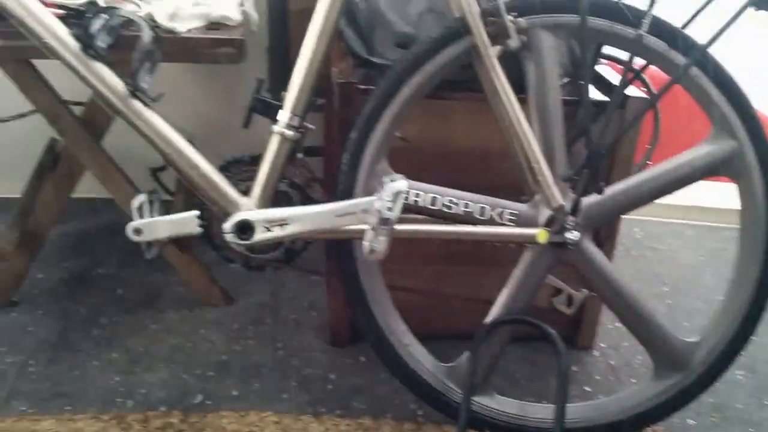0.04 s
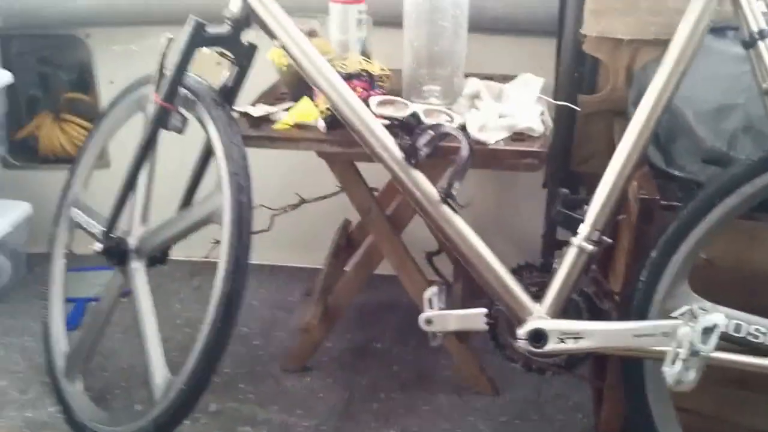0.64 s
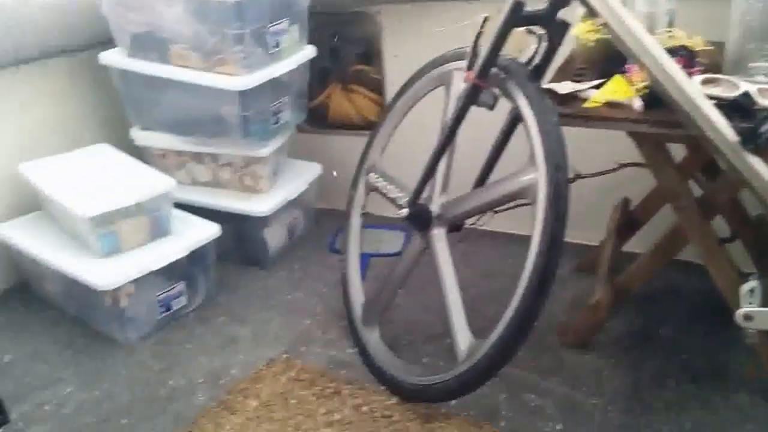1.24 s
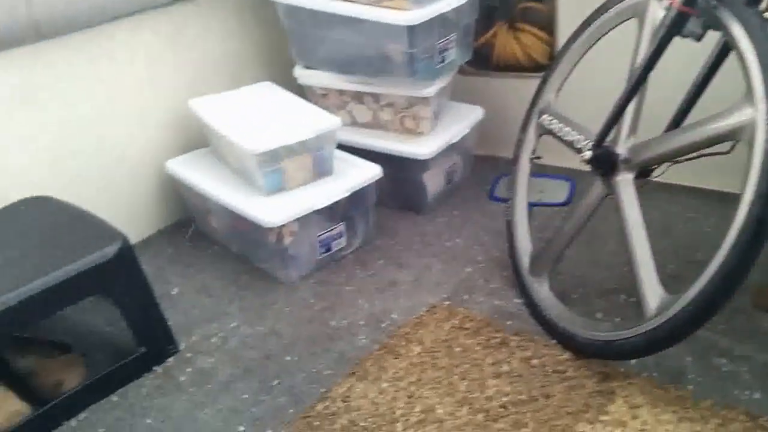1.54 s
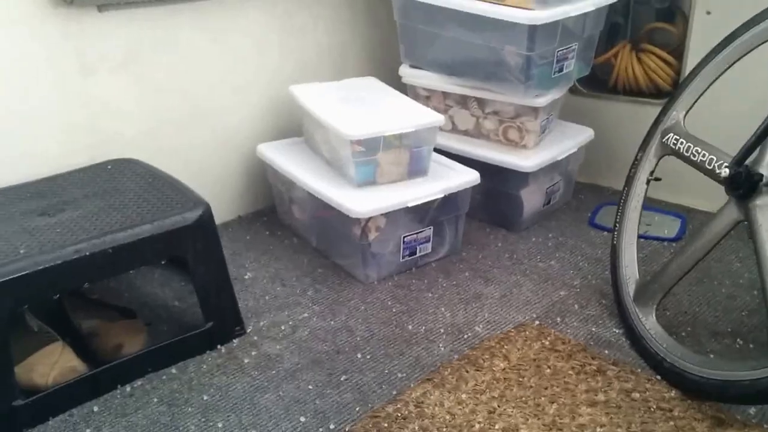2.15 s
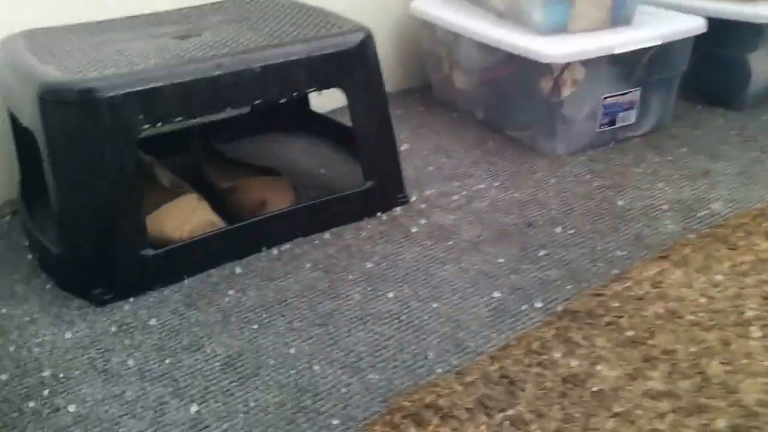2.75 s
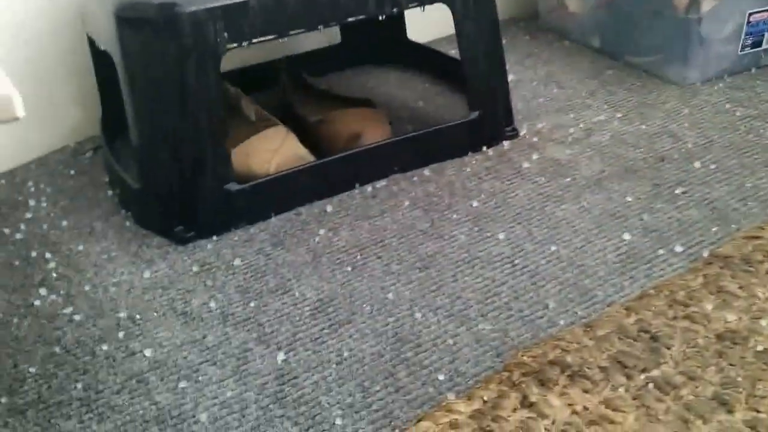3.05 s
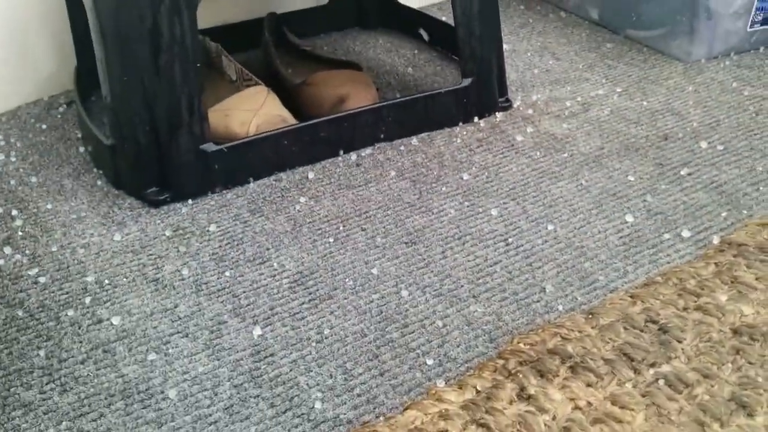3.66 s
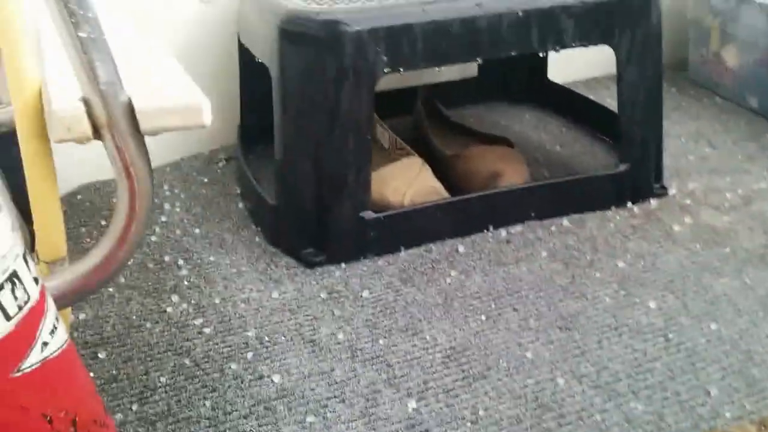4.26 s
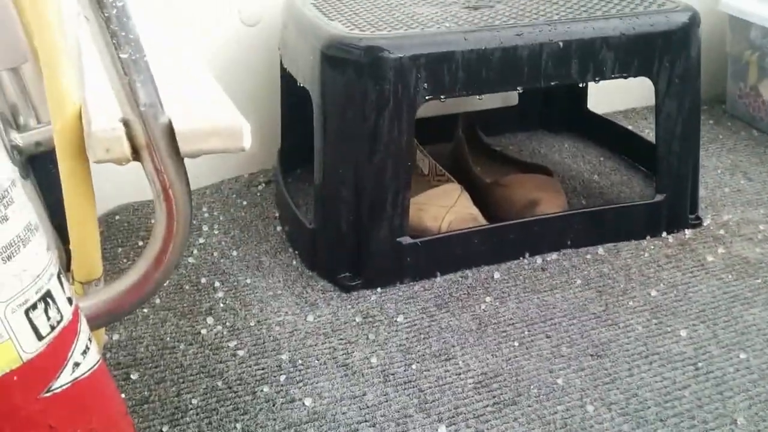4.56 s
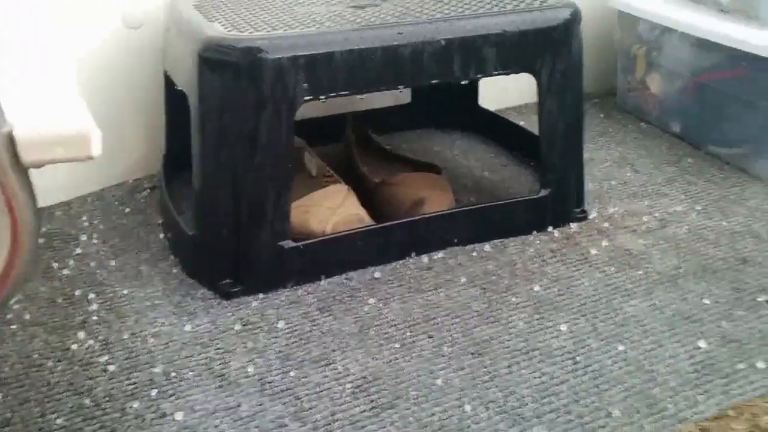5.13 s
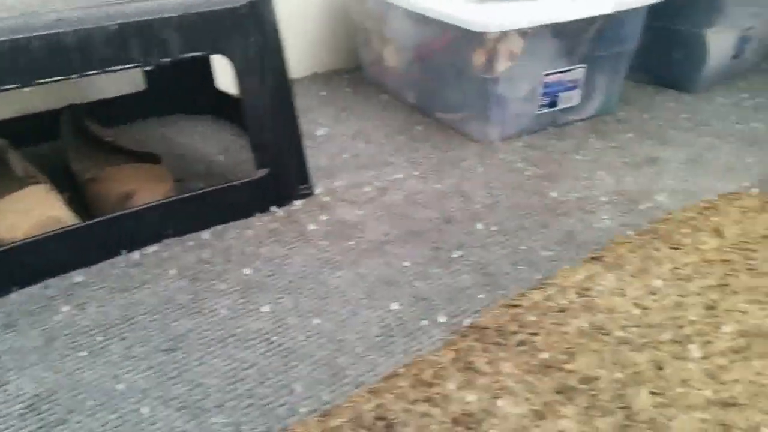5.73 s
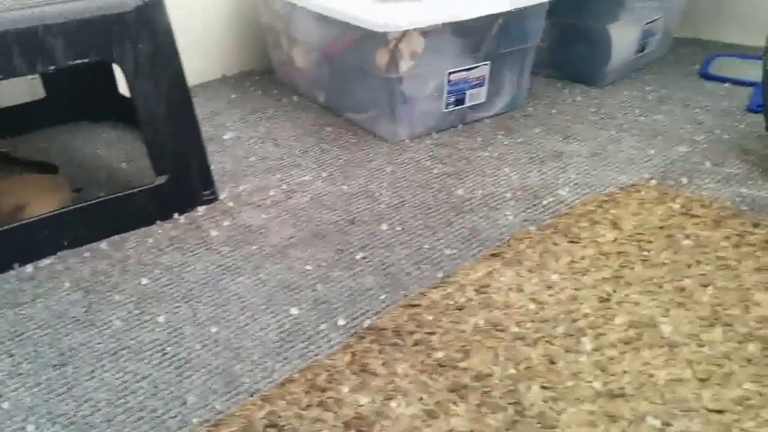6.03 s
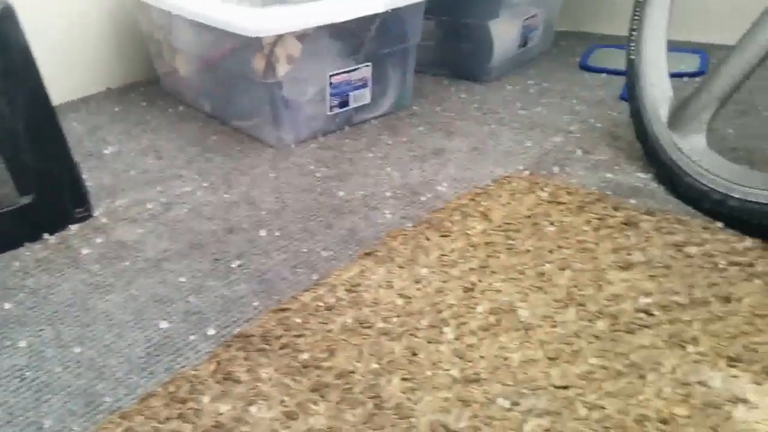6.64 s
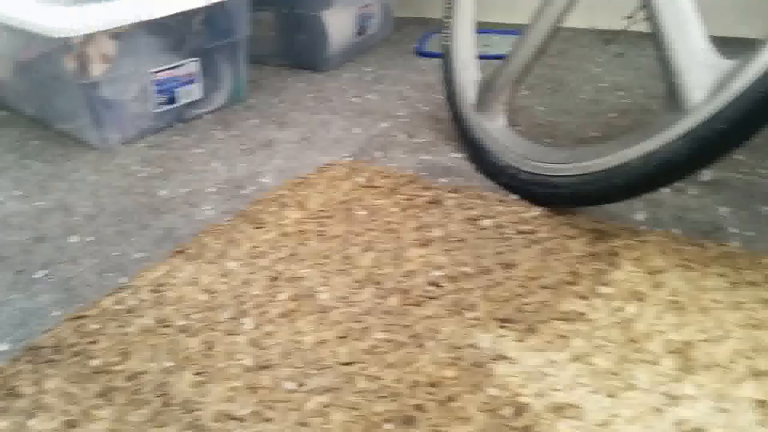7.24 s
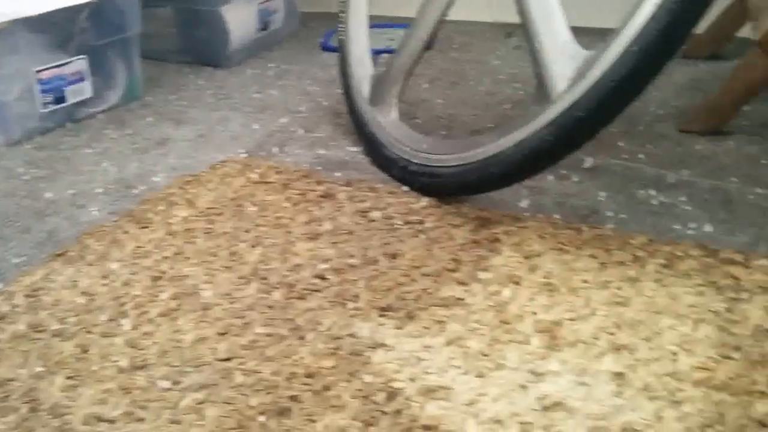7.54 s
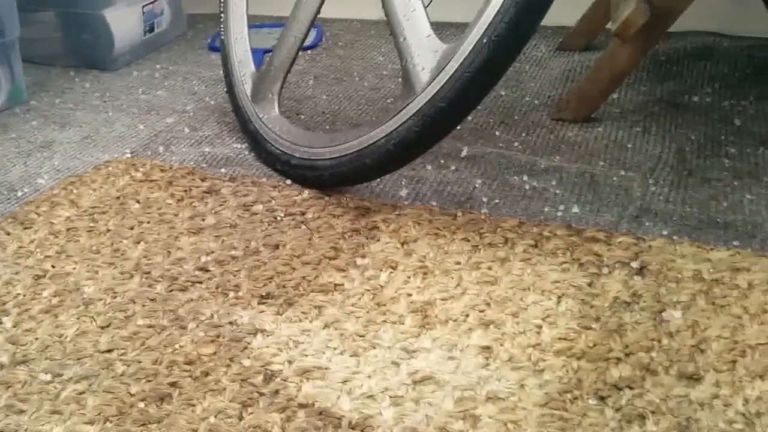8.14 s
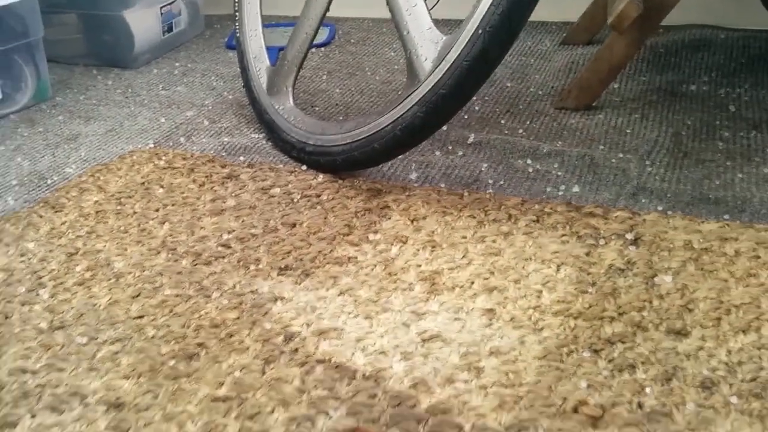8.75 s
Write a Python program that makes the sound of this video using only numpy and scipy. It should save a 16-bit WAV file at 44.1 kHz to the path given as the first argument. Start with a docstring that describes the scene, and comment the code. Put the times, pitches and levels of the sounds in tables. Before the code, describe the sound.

Small hailstones blow into a porch and patter continuously, swelling and easing in gusts. Bigger stones close to the microphone knock on plastic boxes, a stool and the walls, with bright icy ticks, hollow pops and little bounces. Large panels answer with dull thuds. A heavy knock lands about two seconds in and a sharp crack around four seconds. Faint distant hail hisses behind, and the porch adds a brief echo.

```python
"""Small hailstones blow into a porch and hit plastic boxes, a stool, the walls and the carpet.
Each big stone knocks on what it strikes, ticks and hops once; large panels answer with dull thuds.
Countless smaller stones patter and skitter around them in gusts, over the faint hiss of far-off hail.
Each hit is a short push of noise shaped by the tones of the thing struck; the porch adds a brief echo."""
import sys
import numpy as np
from scipy import signal
from scipy.fft import rfft, irfft
from scipy.io import wavfile

SR = 44100
rng = np.random.default_rng(int(sys.argv[2]) if len(sys.argv) > 2 else 0)


def pcm_store(signal):
    """Save signal as 16-bit PCM."""
    levels = np.round(np.clip(np.atleast_2d(signal), -1, 1) * 32767)
    wavfile.write(sys.argv[1], SR, levels.astype(np.int16).T)


N = 387638
TIME = np.arange(N) / SR
SIZE = 8192  # samples in one hit
AGE = np.arange(SIZE) / SR  # seconds since the hit
FREQS = np.fft.rfftfreq(SIZE, 1 / SR)

# how strongly struck things knock, from low to high: f/Hz, level/dB
KNOCK_TONE = [(100, -18), (450, 7), (700, 6), (4100, 1.5), (5100, -7), (13000, -21.5)]
# the bright tone of ticking ice: f/Hz, level/dB
ICE_TONE = [(2500, -65), (4900, -18.5), (6500, -7.5), (8400, -2.5), (11000, -5.5), (15500, -14.5)]


def gain_of(db):
    """Turns decibels into a number to multiply by."""
    return 10 ** (np.asarray(db) / 20)


def unit_level(x):
    """Scales a sound to an average power of one."""
    return x / np.sqrt(np.mean(x ** 2) + 1e-20)


def unit_blow(x, blow_s=0.002):
    """Gives a hit the same energy as a sound of power one lasting blow_s."""
    return x * np.sqrt(SR * blow_s / (np.sum(x ** 2) + 1e-20))


def add(mix, start_s, sound):
    """Mixes a sound in at the given time."""
    part = mix[max(round(start_s * SR), 0):][:len(sound)]
    part += sound[:len(part)]


def curve(points, hz):
    """Joins (frequency, level) points with lines, giving each octave equal room."""
    point_hz, point_db = np.transpose(points)
    return np.interp(np.log(hz + 1), np.log(point_hz), point_db)


def hump(hz, slope_db):
    """A broad peak in dB around one pitch, falling by slope_db an octave on both sides."""
    return np.maximum(-slope_db * abs(np.log2((FREQS + 1) / hz)), -70)


def resonance(hz, width_hz):
    """The bell-shaped power curve of something that rings at one pitch."""
    return 1 / (1 + ((FREQS - hz) / width_hz) ** 2)


def spot_tone(spacing_hz, depth_db):
    """Every spot that is struck has its own chance peaks and dips, in dB."""
    hz = np.arange(0, SR, spacing_hz)
    bumps = np.clip(rng.standard_normal(SIZE // 2)[:len(hz)], -2, 2)
    return depth_db * np.interp(FREQS, hz, bumps)


def ring(push, tone_db):
    """Shapes a push with a tone curve, whose peaks ring on after the blow."""
    cepstrum = irfft(np.log(gain_of(tone_db)))
    # fold the filter forward in time, so nothing sounds before the push
    cepstrum[1:SIZE // 2] *= 2
    cepstrum[SIZE // 2 + 1:] = 0
    return irfft(rfft(push) * np.exp(rfft(cepstrum)))


def gusts():
    """The hail comes in gusts: one gain over time for tapping stones, one for skittering ice."""
    # strength of the shower, before each layer's own gain: t/s, stone level/dB, ice level/dB
    shower = [(0.0, -50.5, -59), (0.56, -50.5, -54.5), (0.98, -42.5, -64.5), (1.27, -51.5, -54),
              (1.96, -45.5, -55.5), (2.182, -40.5, -51), (2.47, -54.5, -56), (3.67, -64, -66),
              (3.89, -50, -58), (4.31, -52, -56.5), (4.6, -62.5, -69.5), (5.46, -52.5, -52.5),
              (6.24, -61, -65.5), (6.46, -49, -58), (6.83, -53.5, -65), (7.46, -45.5, -56),
              (8.13, -52.5, -63.5), (8.79, -47.5, -58.5)]
    times, stone_db, ice_db = np.transpose(shower)
    return gain_of(np.interp(TIME, times, stone_db)), gain_of(np.interp(TIME, times, ice_db))


def patter(sounds, per_s, spread_db):
    """A steady fall: one hit of random kind and strength at a random moment in each short stretch."""
    out = np.zeros(N)
    draws = rng.random((2000, 3))[:int(per_s * N / SR) + 1]
    for slot, (when, kind, chance) in enumerate(draws):
        boost_db = spread_db * min(-np.log(chance), 3)  # many weak hits, few strong ones
        add(out, (slot + when) / per_s, gain_of(boost_db) * sounds[int(kind * len(sounds))])
    return unit_level(out)


def small_stones(count=48):
    """Little stones tap all around, some with a hollow pop; ice skitters in tiny sprays and clicks."""
    taps = [tap(hz) for hz in np.geomspace(600, 3200, count)]
    taps += [pop(hz) for hz in np.geomspace(700, 3400, count)]
    bits = [tick(near=rng.random() / 2) for _ in range(count)]
    bits += [chip() / 2 for _ in range(count // 4)]
    stone_gusts, ice_gusts = gusts()
    stones = stone_gusts * gain_of(-4) * patter(taps, per_s=150, spread_db=9)
    ice = ice_gusts * gain_of(0.5) * patter(bits, per_s=130, spread_db=9)
    return stones + ice


def tap(hz, longest_wait_s=0.019):
    """A stone farther off gives a rounded knock, then rattles on in two little pops of other pitches."""
    out = knock(near=0.25, hz=hz, treble_db_per_octave=-3, slope_db=5.0)
    for wait, octaves in rng.random((2, 2)):
        add(out, wait * longest_wait_s, gain_of(-7) * pop(hz * 2 ** (octaves - 0.5)))
    return unit_blow(out)


def strike(near, crack_s, scatter_s, rise_s, clump_db, skip_wait_s=(0.0031, 0.0066), skip_fade_s=0.015):
    """A stone's push: a sharp crack if near (1), a swell of reflections if far (0), then two skips."""
    near = np.clip(near, 0, 1)
    crack = unit_blow(np.exp(-AGE / (crack_s * (1.12 - near))))
    clumps = gain_of(clump_db * np.interp(AGE, AGE[::SIZE // 128], rng.standard_normal(128)))
    scatter = unit_blow(clumps * np.exp(-AGE / scatter_s) * (1 - np.exp(-AGE / rise_s)) ** 2)
    power = near * crack ** 2 + (1 - near) * scatter ** 2
    for t in np.cumsum(rng.uniform(*skip_wait_s, 2)):
        skip = gain_of(-7) * np.exp(-t / skip_fade_s) * crack
        add(power, t, skip ** 2)
    return np.sqrt(power) * rng.standard_normal(SIZE)


def knock(near, hz, treble_db_per_octave, slope_db, muffle_db=20):
    """The struck surface gives a little, softer from afar, then rings briefly around its own pitch."""
    tone_db = curve(KNOCK_TONE, FREQS) + hump(hz, slope_db) + 7.0 * resonance(hz, width_hz=120)
    tone_db += spot_tone(spacing_hz=316.0, depth_db=4.8)
    tone_db += treble_db_per_octave * np.log2(np.maximum(FREQS / 2800, 1))
    tone_db -= muffle_db * (1 - near) * np.interp(FREQS, (4150, 4070), (0, 1))  # far stones lose treble
    give_s = 0.00031 + 0.0033 * (1 - near) ** 2
    soft_start = 1 - np.exp(-AGE / give_s)
    push = strike(near, crack_s=0.02, scatter_s=0.015, rise_s=0.0011, clump_db=2.0)
    return unit_blow(ring(push * soft_start, tone_db))


def pop(hz, rise_s=0.0013, fade_s=0.0024):
    """A hollow wall swells and rings for a moment in a cluster of close pitches."""
    push = rng.standard_normal(SIZE) * (1 - np.exp(-AGE / rise_s)) ** 2 * np.exp(-AGE / fade_s)
    tone_db = curve(KNOCK_TONE, FREQS) + hump(hz, slope_db=14) + spot_tone(325, 4.7)
    return unit_blow(ring(push, tone_db))


def tick(near):
    """The bright tick of the ice: a soft spray from afar, starting with a sharp snap from close by."""
    push = unit_blow(strike(near, crack_s=0.0078, scatter_s=0.011, rise_s=0.0027, clump_db=4.5))
    snap = 0.69 * near ** 2 * unit_blow(signal.unit_impulse(SIZE))
    return unit_blow(ring(push + snap, curve(ICE_TONE, FREQS) + spot_tone(720, 1.8)))


def chip(spray_db=-3, spray_s=0.005):
    """A chip of ice clicks: one crisp snap and a weaker, short spray."""
    spray = unit_blow(rng.standard_normal(SIZE) * np.exp(-AGE / spray_s))
    push = unit_blow(signal.unit_impulse(SIZE)) + gain_of(spray_db) * spray
    return unit_blow(ring(push, curve(ICE_TONE, FREQS) + spot_tone(930, 8.4)))


def distant_hail(follow=0.66):
    """Far-off hail merges into a faint hiss that partly follows the gusts."""
    # tone of the far-off hail: f/Hz, relative level/dB
    hiss_tone = [(20, -12), (60, 21), (250, 11), (1000, 4.5), (3300, -15.5), (5200, -12), (8400, 3.5),
                 (16000, -18)]
    tone = gain_of(curve(hiss_tone, np.fft.rfftfreq(N, 1 / SR)))
    hiss = irfft(rfft(rng.standard_normal(N)) * tone, N)
    stone_gusts, _ = gusts()
    return gain_of(-66.5) * unit_level(hiss * stone_gusts ** follow)


def thud(hz, fade_cycles=5.65, rise_s=0.0012):
    """A large panel swells and rings low; the lower it is, the longer it lasts."""
    push = rng.standard_normal(SIZE) * np.exp(-AGE * hz / fade_cycles) * (1 - np.exp(-AGE / rise_s))
    return unit_blow(ring(push, hump(hz, slope_db=10.7) + spot_tone(58.2, 3.5)))


def panels(follow=0.62, roll_middle_s=3.333, roll_half_s=0.18, sway_wait_s=0.018):
    """Large panels thud over a soft drumming that partly follows the gusts, with one quick roll."""
    # the heaviest blows on the panels: t/s, level/dB, f/Hz
    heavy_blows = [(0.049, -32, 410), (0.22, -34.5, 200), (0.32, -29, 352), (0.396, -29.5, 368),
                   (0.592, -28, 396), (0.82, -43, 233), (1.312, -29, 223), (1.705, -27.5, 380),
                   (1.757, -19.5, 314), (1.836, -35, 380), (2.022, -14, 217), (2.124, -28.5, 150),
                   (2.597, -33, 160), (2.886, -31.5, 224), (3.105, -25.5, 248), (3.622, -38, 258),
                   (3.706, -33.5, 240), (4.861, -29.5, 240), (5.253, -29, 192), (5.834, -29.5, 310),
                   (6.981, -35, 282), (7.042, -33.5, 285), (7.278, -30, 336), (7.355, -30, 315),
                   (7.475, -36.5, 307), (7.526, -33, 165), (7.674, -32, 310), (7.916, -26.5, 290),
                   (8.103, -30, 390), (8.28, -27, 182), (8.418, -32, 274), (8.675, -29.5, 303)]
    stone_gusts, _ = gusts()
    gentle_gusts = stone_gusts.mean() * (stone_gusts / stone_gusts.mean()) ** follow
    drumming = patter([thud(hz) for hz in np.geomspace(135, 450, 20)], per_s=28, spread_db=8)
    roll = patter([thud(hz) for hz in np.geomspace(110, 300, 20)], per_s=34, spread_db=7.5)
    out = gain_of(-4.5) * gentle_gusts * drumming
    out += gain_of(-42) * roll / np.sqrt(1 + ((TIME - roll_middle_s) / roll_half_s) ** 4)
    for t, db, hz in heavy_blows:
        add(out, t, gain_of(db) * thud(hz))
        sway_db = 1.785 * db + 3  # a heavy blow sets the whole panel swaying, later and far lower
        add(out, t + sway_wait_s, gain_of(sway_db) * thud(hz=80, fade_cycles=4.0))
    return out


def hailstones(hop_wait_s=(0.03, 0.047), hop_db=-22):
    """The big stones land, hop and land again; others tap, pop, click, shatter or ring."""
    # big stones: t/s, knock level/dB, f/Hz, tick level/dB, nearness from 0 to 1
    big_hits = [(0.05, -26.5, 910, -29, 0.8), (0.278, -29.5, 1110, -36, 0.4), (0.4, -29.5, 900, -40, 0.57),
                (0.408, -29.5, 1230, -28.5, 0.5), (0.426, -27.5, 1050, -31, 0.3),
                (0.5904, -20.5, 900, -27.5, 0.76), (0.962, -27, 1440, -35.5, 0.8),
                (1.045, -33, 920, -34.5, 0), (1.154, -22.5, 4340, -16, 0.6), (1.233, -36.5, 4070, -24, 0.5),
                (1.313, -21, 1110, -33, 0.79), (1.379, -35.5, 810, -32.5, 0.4),
                (1.437, -25, 2680, -24.5, 0.86), (1.485, -33.5, 3670, -37, 0.7),
                (1.679, -34.5, 880, -25, 0.74), (1.71, -24.5, 705, -38, 0.1),
                (1.735, -29.5, 2850, -24.5, 0.75), (1.768, -22.5, 500, -29.5, 0.6),
                (1.976, -25.5, 1720, -27.5, 0.63), (2.005, -21.5, 1460, -29, 0.2),
                (2.02, -14.5, 540, -38, 0.73), (2.168, -23.5, 2180, -21, 0.98),
                (2.609, -28.5, 1760, -35.5, 0.88), (2.89, -28.5, 1170, -45, 0.62),
                (3.026, -42.5, 4660, -23, 0.83), (3.101, -21.5, 1440, -20, 0.99),
                (3.611, -38.5, 3370, -30, 0.85), (3.704, -20, 1270, -33, 0.84),
                (3.802, -29.5, 1690, -26, 0.98), (3.863, -38.5, 1800, -30.5, 0.57),
                (3.991, -18.5, 2400, -23.5, 0.05), (4.029, -13, 4700, -13, 0.95),
                (4.036, -23.5, 1500, -30, 0.3), (4.075, -26, 1580, -31, 0.37),
                (4.481, -35.5, 1370, -31.5, 0.75), (4.954, -35, 1470, -35, 0.1),
                (5.004, -28.5, 900, -31, 0.95), (5.154, -25.5, 2200, -51, 1), (5.228, -24, 1400, -29, 0.3),
                (5.352, -27, 2720, -29, 0.72), (5.459, -26, 3030, -32.5, 0.67),
                (5.873, -37, 1520, -27, 0.66), (6.296, -35, 1570, -34, 0), (6.371, -27, 1460, -32, 1),
                (6.383, -24, 1440, -27.5, 0.23), (7.071, -31, 2620, -27.5, 0.62),
                (7.2789, -29.5, 1540, -23, 0.85), (7.287, -26.5, 1740, -42, 0.83),
                (7.36, -33, 1460, -44, 0.72), (7.482, -35, 2620, -41, 0.95), (7.586, -31.5, 2530, -36, 0.1),
                (7.627, -35.5, 3430, -25.5, 1), (8.348, -27, 990, -43, 0.5),
                (8.585, -23.5, 3840, -29, 0.85)]
    # stones that land farther off with a dull tap: t/s, level/dB, f/Hz
    far_taps = [(0.011, -33.5, 630), (0.182, -35.5, 1680), (0.265, -32.5, 1540), (0.292, -25, 2950),
                (0.365, -33.5, 1060), (0.38, -25, 1040), (0.5, -30.5, 1450), (0.644, -32.5, 1270),
                (0.695, -35.5, 990), (0.771, -35.5, 920), (0.8, -29.5, 920), (0.829, -38.5, 2700),
                (0.982, -34, 1550), (1.019, -33, 2880), (1.138, -29, 3300), (1.604, -33, 1080),
                (1.756, -27, 570), (1.965, -32, 1480), (4.23, -31.5, 1530), (4.319, -38, 1650),
                (4.912, -34.5, 1170), (5.212, -33.5, 1090), (5.402, -36.5, 1370), (5.483, -42, 2480),
                (5.561, -30, 1480), (5.642, -31, 2100), (5.726, -34, 1450), (5.769, -29.5, 1550),
                (5.833, -28, 860), (5.919, -37, 2300), (6.097, -39.5, 2080), (6.666, -38, 1900),
                (6.838, -40, 2830), (6.87, -31, 980), (6.977, -30.5, 1110), (7.173, -40, 1500),
                (7.437, -38.5, 1460), (7.742, -35, 1430), (7.809, -31, 2200), (7.861, -31.5, 1490),
                (7.96, -35, 1610), (8.276, -30.5, 1280), (8.678, -41, 1070), (8.75, -34.5, 1040)]
    # stones that land square on a hollow box: t/s, level/dB, f/Hz
    box_hits = [(0.321, -35, 1090), (0.937, -28.5, 1480), (2.135, -16, 1840), (2.218, -32.5, 2750),
                (2.322, -35, 910), (2.384, -31.5, 1720), (2.787, -22, 2350), (3.204, -28, 1490),
                (3.335, -26.5, 2660), (3.674, -20, 1510), (4.116, -28.5, 1900), (4.193, -25.5, 1480),
                (4.352, -30, 2100), (4.407, -24, 1640), (4.575, -31, 1454), (4.764, -29.5, 1280),
                (5.523, -28.5, 1650), (5.782, -26.5, 1660), (6.539, -28.5, 1400), (7.139, -25, 1480),
                (7.543, -28.5, 1030), (7.656, -32.5, 2000), (8.075, -30.5, 1450), (8.39, -32.5, 1230),
                (8.5, -38.5, 2300)]
    # chips of ice that click close by: t/s, level/dB
    clicks = [(0.56, -36.5), (2.17, -30.5), (2.285, -39), (2.48, -29), (3.081, -35.5), (3.258, -33.5),
              (3.776, -31.5), (5.287, -37.5), (5.406, -36), (6.447, -32.5), (6.597, -39), (7.154, -33.5),
              (8.21, -38), (8.356, -38), (8.39, -40)]
    # stones that shatter into a soft spray of ice: t/s, level/dB
    sprays = [(1.023, -35), (1.136, -28), (1.641, -40), (2.468, -38.5), (2.678, -38), (3.32, -41),
              (3.676, -38), (4.267, -39.5), (5.372, -35.5), (7.391, -35), (7.436, -40)]
    # stones that glance off something hard: t/s, level/dB, f/Hz, peak width/Hz
    glances = [(4.025, -25, 8360, 297), (5.153, -28.5, 5300, 780), (6.294, -26, 8760, 130),
               (7.03, -24, 9250, 900)]
    out = np.zeros(N)
    for t, knock_db, hz, tick_db, near in big_hits:
        landings = (0, 0), (rng.uniform(*hop_wait_s), hop_db)
        for wait_s, landing_db in landings:
            surface = gain_of(knock_db) * knock(near, hz, treble_db_per_octave=3, slope_db=4.0)
            ice = gain_of(tick_db) * tick(near)
            add(out, t + wait_s, gain_of(landing_db) * (surface + ice))
    for t, db, hz in far_taps:
        add(out, t, gain_of(db) * tap(hz))
    for t, db, hz in box_hits:
        add(out, t, gain_of(db) * box_hit(hz))
    for t, db in clicks:
        add(out, t, gain_of(db) * chip())
    for t, db in sprays:
        add(out, t, gain_of(db) * tick(near=0))
    for t, db, hz, width_hz in glances:
        add(out, t, gain_of(db) * tink(hz, width_hz))
    return out


def box_hit(hz, rattle_db=-8, tick_db=-17):
    """A square hit on a hollow box: one strong pop, a little rattle of its walls and a faint icy tick."""
    box = unit_blow(pop(hz) + gain_of(rattle_db) * tap(hz))
    return box + gain_of(tick_db) * tick(near=0.93)


def tink(hz, width_hz):
    """A stone glances off something hard, which rings at one high pitch."""
    push = strike(near=0.5, crack_s=0.0035, scatter_s=0.01, rise_s=0.0024, clump_db=2.5)
    return unit_blow(ring(push, 20 * np.log10(resonance(hz, width_hz))))


def porch_echo(sound, fade_s=0.15, rise_s=0.0012):
    """Walls and roof give a short, dense echo that falls by 60 dB in fade_s."""
    t = TIME[:SR // 2]
    tail = rng.standard_normal(len(t)) * np.exp(-np.log(1000) * t / fade_s) * (1 - np.exp(-t / rise_s))
    return signal.oaconvolve(sound, tail / np.linalg.norm(tail))[:N]


def scene():
    """All the hail, with the porch around it, in one channel."""
    hail = hailstones() + small_stones() + panels()
    return (hail + gain_of(-13.0) * porch_echo(hail) + distant_hail())[None]


def record(dry, lowest_hz=34, highest_hz=15950):
    """The small microphone loses the deepest bass; the very highest treble is cut too."""
    bass_cut = signal.butter(4, lowest_hz, "high", fs=SR, output="sos")
    treble_cut = signal.firwin(511, highest_hz, window=("kaiser", 9), fs=SR)
    return signal.oaconvolve(signal.sosfilt(bass_cut, dry), treble_cut[None], "same")


dry = scene()
out = record(dry)
pcm_store(out)
```